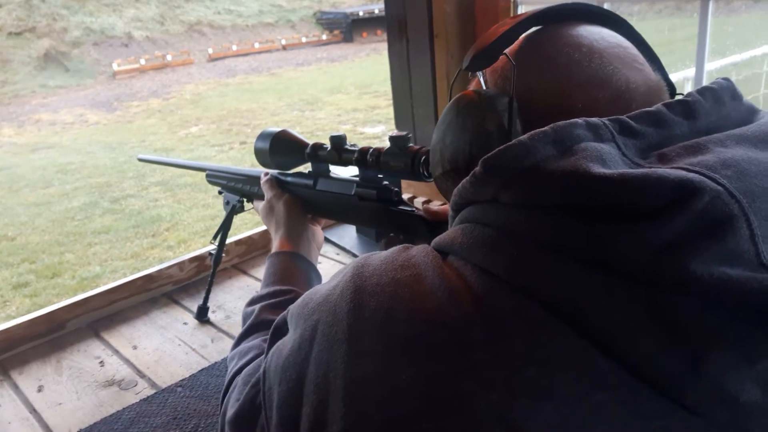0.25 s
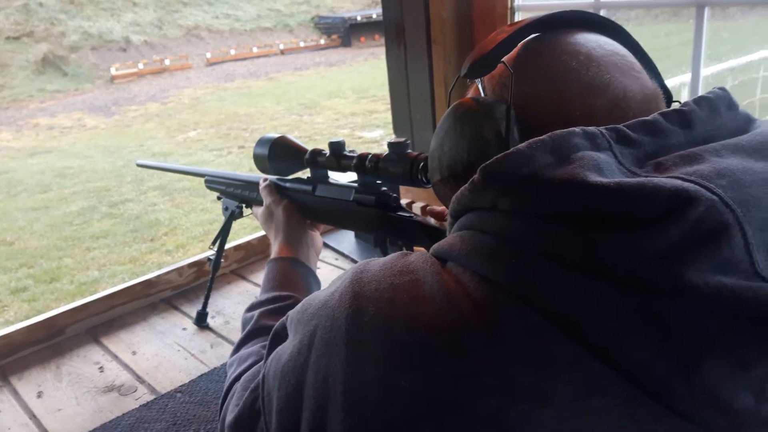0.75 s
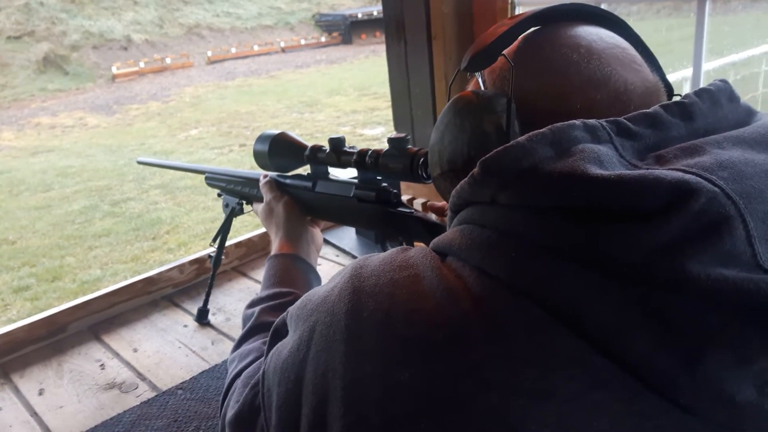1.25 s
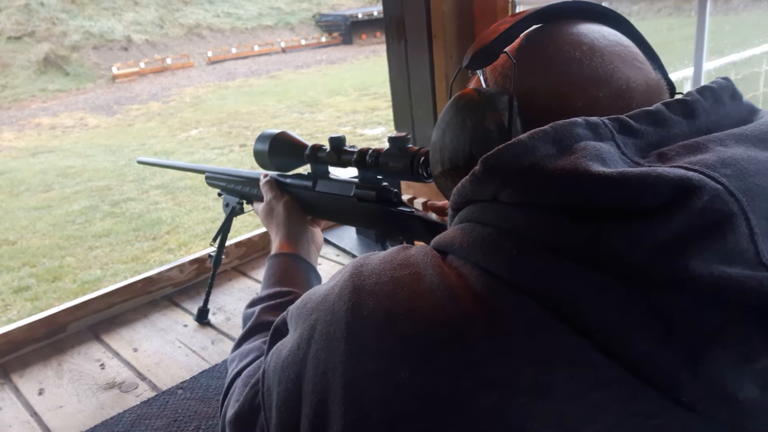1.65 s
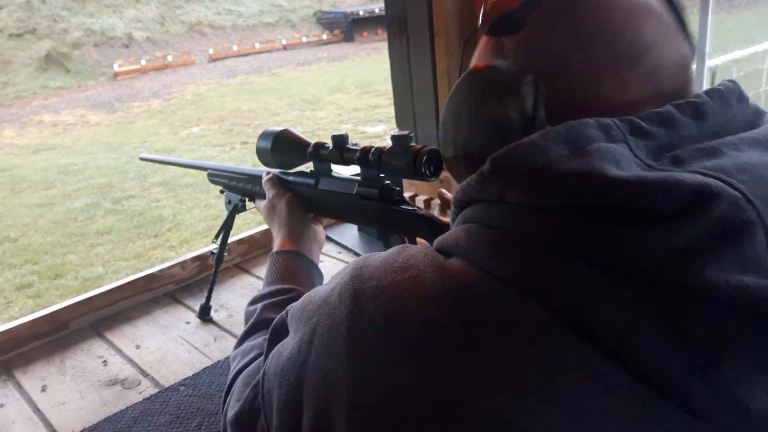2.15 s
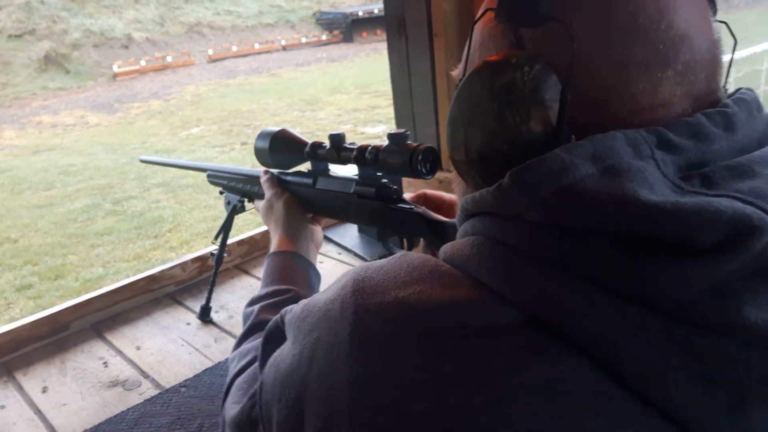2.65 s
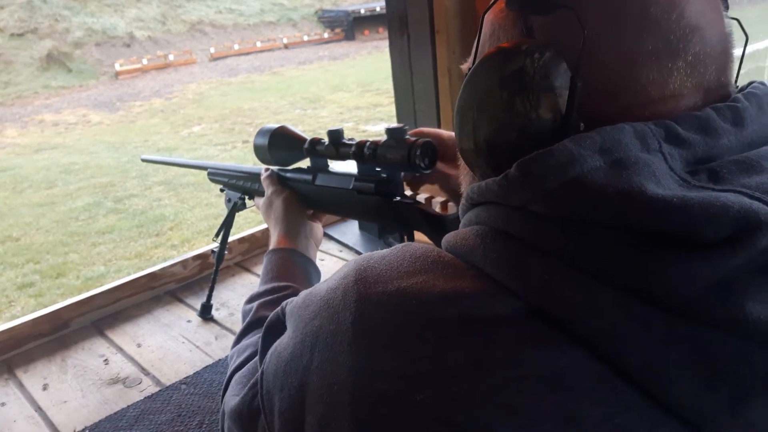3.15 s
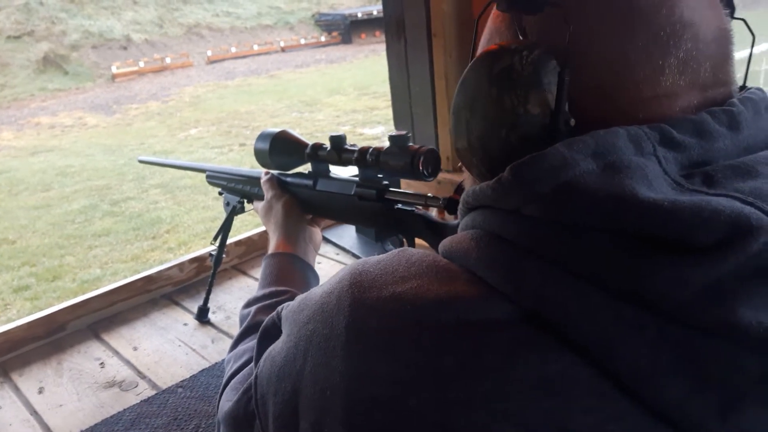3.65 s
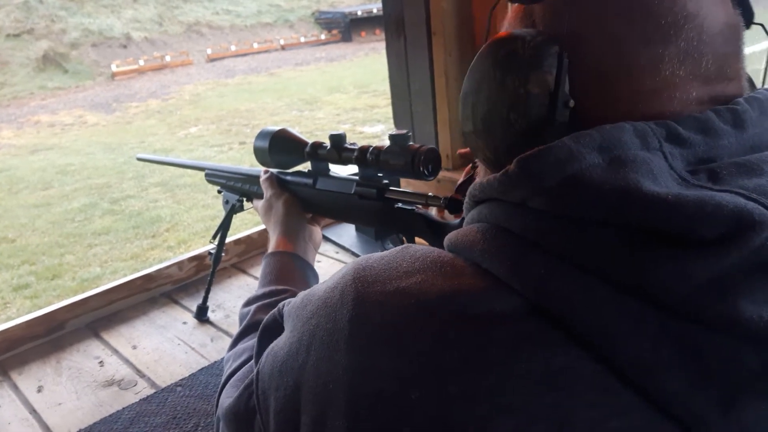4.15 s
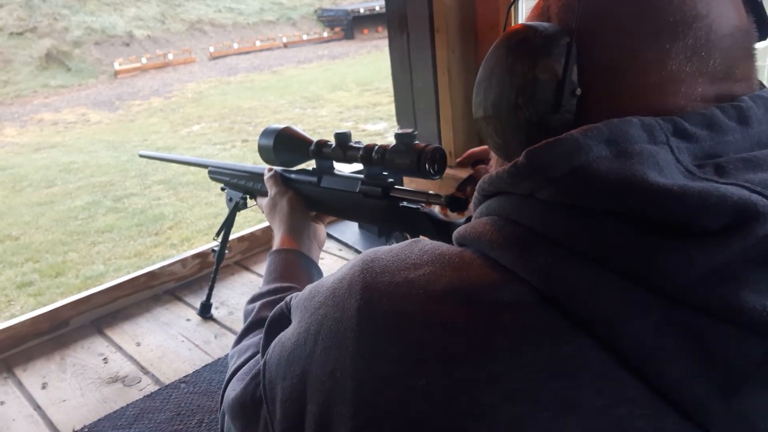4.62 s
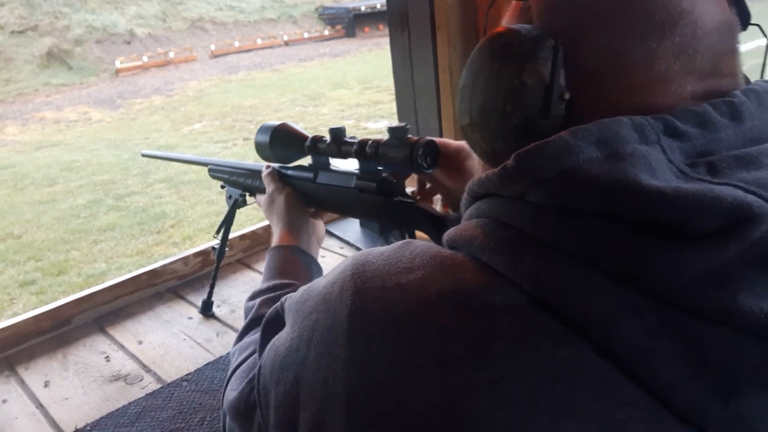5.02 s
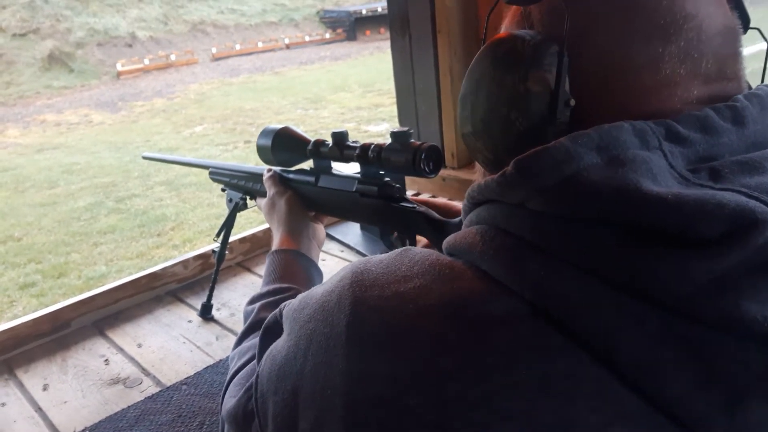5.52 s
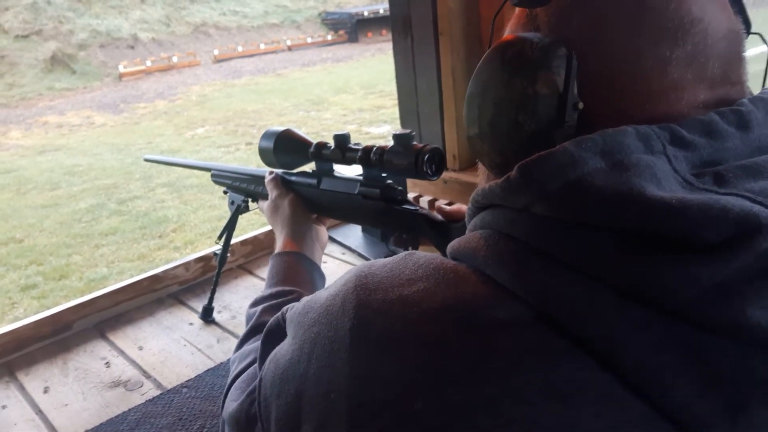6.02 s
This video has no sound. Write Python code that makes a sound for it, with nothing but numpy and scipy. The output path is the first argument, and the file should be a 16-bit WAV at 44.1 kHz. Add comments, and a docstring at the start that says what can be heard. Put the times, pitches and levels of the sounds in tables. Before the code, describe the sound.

Right at the start a rifle fires very close in a wooden shelter, overloading the microphone. The boxy boom is followed at once by the bullet's crack into a backstop and an echoing roll from the field. The sound ducks, then dull outdoor rumble creeps back. Much quieter metal clicks, scrapes and a firm clack follow as the bolt is worked, with soft bench knocks; later a second, sharper cluster of clicks.

```python
"""A bolt-action rifle is fired from a wooden shelter: a shock front, then noise and modes boom and ring.
The blast overloads the input and returns from the field as echoes and decaying noise; the bullet cracks
into the backstop. The gain control ducks at once, holds, and slowly lets the outdoor rumble (wavering
noise) back in. The bolt is then lifted, drawn back and closed: noise bursts ring the resonances of stock and
action, steel slides and squeals, and hands and arms knock on the wooden bench."""
import sys
import numpy as np
from scipy import signal
from scipy.io import wavfile
from scipy.ndimage import minimum_filter1d

SR = 44100
rng = np.random.default_rng(int(sys.argv[2]) if len(sys.argv) > 2 else 0)


def master(y):
    """Save y as 16-bit WAV."""
    cut = np.clip(np.atleast_2d(y).T, -1, 1)
    pcm = np.round(cut * 32767)  # scale
    wavfile.write(sys.argv[1], SR, pcm.astype(np.int16))


N = 276827

SHOT_S, IMPACT_S = .157, .353
# Blast filling the shelter: (frequency [Hz], relative spectral density [dB])
BLAST_SPECTRUM = [(30, -35), (70, -16), (109, -6), (189, 0), (277, 1), (450, 6), (620, 6), (800, 2),
                  (1190, -1), (1936, -11), (4870, -22), (7000, -30.5), (15000, -33)]
# Blast returning from field and trees: (frequency [Hz], relative spectral density [dB])
ROLL_SPECTRUM = [(30, -21), (80, -14), (160, 1.5), (360, -4), (710, -2), (1200, -11.5), (2200, -23),
                 (5000, -27), (15000, -46)]
# Spray of earth from the backstop: (frequency [Hz], relative spectral density [dB])
SPRAY_SPECTRUM = [(40, -27), (260, 9), (493, 4.5), (1280, -3), (3400, -15.5), (4970, -25.5), (14700, -78)]
# Air and boards of the shelter: (frequency [Hz], level [dB], t60 [s])
SHELTER_MODES = [(153, 22.5, 0.47), (238.4, 27.5, 0.4), (277.3, 23.5, 0.32), (296.4, 20, 0.38),
                 (349, 23.5, 0.25), (380.8, 20.5, 0.2), (409, 22.5, 0.22), (470.6, 25, .27),
                 (520.7, 23, 0.3), (553, 23.5, 0.2), (644.7, 29, 0.16), (703, 23.5, 0.32),
                 (890, 18.5, 0.25), (925, 22, .2), (1063, 18.5, 0.15), (1140, 19, .22)]
# Metal fittings that sing on, a close pair beating: (frequency [Hz], level [dB], t60 [s])
FITTING_MODES = [(484, -23, 1.8), (662, -14, 1.0), (1109, -22, 1.2), (2148, -12, .5), (3316, -12, .42),
                 (1497, 5, .56), (1507, 1, .56)]
# Bright echoes off fence and target frames: (delay [s], level re blast [dB])
ECHOES = [(0.086, -25.5), (0.137, -27)]
# Backstop giving way with a low thump: (frequency [Hz], level [dB], t60 [s])
BACKSTOP_MODES = [(165, 12, .1), (245, 17, .08), (340, 12, .07)]
# Splintering crack of the backstop: (frequency [Hz], width [Hz], level [dB])
CRACK_RESONANCES = [(910, 540, 4), (1465, 110, 1.5), (2320, 350, -8), (3400, 460, -3.5), (5500, 1600, -31)]
# Metal contacts of the bolt; the harder the touch, the flatter its treble:
# (time [s], clank level [dB], treble slope [dB per octave], knock into the stock re clank [dB])
BOLT_CONTACTS = [(2.845, -50, -13.5, -1.5), (3.106, -48.5, -8, 6), (3.176, -48.5, -11, 2),
                 (3.185, -46.5, -11.5, 0), (3.356, -54.5, -13, 0.5), (3.367, -48.5, -13.5, 2),
                 (3.475, -56, -10, 6.5), (3.549, -45.5, -6, -5), (3.638, -49.5, -2, 5.5),
                 (3.659, -35, -15, -4.5), (3.682, -49, -17, 5.5), (5.061, -53, -11, 3.5),
                 (5.081, -49.5, -16.5, 4.5), (5.103, -41, -6, 0.5), (5.184, -46.5, -9, -1),
                 (5.235, -51, -10.5, -4)]
# Ranges of knock, clank, click and snap: (low edge [Hz], high edge [Hz], t60 [s])
CONTACT_BANDS = [(141, 680, 0.17), (847, 1730, 0.15), (2040, 4440, 0.16), (5100, 15000, 0.18)]
# Resonances of stock and action: (frequency [Hz], width [Hz], level [dB])
RIFLE_MODES = [(168, 15, 18), (266.5, 30, 15), (478, 27, 7), (553, 17, 11), (1039, 61, 19.5),
               (1111, 30, 19.5), (1196, 43, 13.5), (1527, 38, 11.5), (1646, 44, 3), (2417, 85, 3.5),
               (3185, 83, 3.5), (3940, 71, 5.5), (4170, 62, 5), (4460, 76, 6), (4990, 87, 7)]
# Bolt sliding in its raceway: (time [s], time scale [s], level [dB], squeal [Hz], squeal width [Hz])
SLIDES = [(3.526, 0.027, -71, 5000, 254), (3.558, 0.032, -56.5, 3660, 2200),
          (3.61, 0.022, -52.5, 3000, 350), (3.638, 0.013, -49, 4050, 260), (3.635, 0.014, -48.5, 4960, 220),
          (5.184, 0.0091, -45, 3160, 220)]
# Hands and arms knocking on the bench: (time [s], level [dB])
KNOCKS = [(3.882, -38), (3.89, -39), (3.913, -44), (4.147, -44.5), (4.797, -53), (5.362, -48.5)]
# Bench top: (frequency [Hz], level [dB], t60 [s])
BENCH_MODES = [(164, 1, 0.29), (275.5, -2.5, 0.26), (309, -3, 0.29), (419, -15, 0.18), (477, -3, 0.11),
               (533, -7.5, 0.13), (616, -11, 0.084), (890, -35, 0.073), (1054, -21, 0.11),
               (1267, -16, 0.12), (1620, -28, 0.074)]
# Wind and distant traffic: (frequency [Hz], relative spectral density [dB])
OUTDOORS_SPECTRUM = [(15, -49), (25, -15.5), (27, -19.5), (64, -3), (107, -7), (152, -0.5), (221, -5.5),
                     (305, -9), (399, -16.5), (537, -12), (919, -16.5), (2490, -41.5), (4380, -44.5),
                     (6920, -54.5), (15500, -55)]
# Level of the outdoor rumble, a few dB down at first: (time [s], level [dB])
OUTDOORS_LEVEL = [(1.5, -56), (2.2, -52), (3.6, -51.5), (6.28, -53)]


def shot(blast_db, roll_db, impact_db):
    """Impulsive excitation: the blast sets the shelter ringing, echoes and rolls; the bullet strikes later."""
    out = np.zeros(N)
    blast = from_db(blast_db) * burst(
        BLAST_SPECTRUM, bass_t60=.66, treble_t60=.172, bass_rise_s=.055, treble_rise_s=.0011,
        corner_hz=242, steepness=1.5, size=SR)
    roll = from_db(roll_db) * burst(
        ROLL_SPECTRUM, bass_t60=4, treble_t60=.4, bass_rise_s=.1, treble_rise_s=.1,
        corner_hz=365, steepness=1.3, size=3 * SR)
    spray = from_db(impact_db) * burst(
        SPRAY_SPECTRUM, bass_t60=.12, treble_t60=.23, bass_rise_s=.0094, treble_rise_s=.0022,
        corner_hz=300, steepness=2.2, size=SR // 2)
    shelter = struck(SHELTER_MODES, ring_up_s=.014, scatter=.97, size=SR)
    fittings = struck(FITTING_MODES, ring_up_s=.14, scatter=0, size=2 * SR)
    thump = struck(BACKSTOP_MODES, ring_up_s=.0041, scatter=.47, size=SR // 2)

    add(out, shock(db=26, length_s=.0003), SHOT_S)
    add(out, blast + shelter, SHOT_S)
    add(out, fittings, SHOT_S)
    for delay_s, db in ECHOES:
        echo = band(blast, 2000, 14000)   # slim things throw back only short waves
        add(out, from_db(db) * echo, SHOT_S + delay_s)
    add(out, roll, SHOT_S)
    add(out, spray + thump, IMPACT_S)
    add(out, crack(length_s=.004), IMPACT_S)
    return out


def shock(db, length_s):
    """Blast-wave pressure: an instant rise, then a fall through zero into suction."""
    age = np.arange(SR // 50) / SR / length_s
    return from_db(db) * (1 - age) * np.exp(-age)


def burst(spectrum, bass_t60, treble_t60, bass_rise_s, treble_rise_s, corner_hz, steepness, size):
    """Diffuse reflection: rise and decay times of noise pass from bass to treble values around a corner."""
    t, out = np.arange(size) / SR, 0
    for hz, noise in noise_bands(size):
        lowness = 1 / (1 + (hz / corner_hz) ** steepness)
        t60 = treble_t60 + lowness * (bass_t60 - treble_t60)
        rise_s = treble_rise_s + lowness ** 2 * (bass_rise_s - treble_rise_s)
        envelope = decay(t, t60) * (1 - np.exp(-t / rise_s))
        out = out + noise * from_db(density_db(spectrum, hz)) * envelope
    return out


def struck(modes, ring_up_s, scatter, size):
    """Modal superposition: sines swell together, then each dies away; scatter spreads phases [turns]."""
    t, rings = np.arange(size) / SR, 0
    for hz, db, t60 in modes:
        turns = hz * t + scatter * rng.random()
        rings = rings + from_db(db) * np.sin(2 * np.pi * turns) * decay(t, t60)
    return rings * (1 - np.exp(-t / ring_up_s))


def crack(length_s):
    """Fracture: noise passes twice through each resonance under a swell of a few milliseconds."""
    splinters = rng.standard_normal(SR // 10)
    swell = np.arange(SR // 10) / SR / length_s
    colour = 0
    for hz, width_hz, db in CRACK_RESONANCES:
        ringing = resonance(resonance(splinters, hz, width_hz), hz, width_hz)
        colour = colour + from_db(db) * rms_one(ringing)
    return colour * 2 * swell * np.exp(-swell ** 2)


def bolt():
    """Impact spectrum: each touch knocks the stock and rings the steel; hardness sets its treble slope."""
    out = np.zeros(N)
    steel_hz = np.array([np.sqrt(low * high) for low, high, _ in CONTACT_BANDS[1:]])
    octaves = np.log2(steel_hz / steel_hz[0])   # above the clank
    for s, db, slope_db, stock_db in BOLT_CONTACTS:
        levels_db = db + np.append(stock_db, slope_db * octaves)
        touch = contact(levels_db, direct=5.3, near_db=-16, near_s=.012,
                        linger_db=-29.5, linger_t60=2.5, vary_db=1.5)
        add(out, touch, s)
    return out


def contact(levels_db, direct, near_db, near_s, linger_db, linger_t60, vary_db):
    """Forced resonance: a spike and its reflections off roof and boards excite modes of varying strength."""
    t, out = np.arange(SR) / SR, 0
    echoes = rng.standard_normal(SR) * from_db(3.2 * rng.standard_normal(SR))
    echoes *= 1 + from_db(near_db) * np.exp(-(t / near_s) ** 2)   # nearest surfaces answer loudest
    echoes[0] = direct
    rung = echoes.copy()
    for hz, width_hz, db in RIFLE_MODES:
        mode_db = db + vary_db * rng.standard_normal()   # where the touch lands
        rung += from_db(mode_db) * resonance(echoes, hz, width_hz)
    for db, (low, high, t60) in zip(levels_db, CONTACT_BANDS):
        fading = decay(t, t60) + from_db(linger_db) * decay(t, linger_t60)
        part = band(rung * fading, low, high, order=3)
        out = out + from_db(db) * part / np.std(part[:SR // 50])   # level of the first 20 ms
    return out


def slides():
    """Stick-slip friction: uneven slips excite one resonance, broad for a scrape, narrow for a squeal."""
    out, size = np.zeros(N), SR // 5
    for s, length_s, db, hz, width_hz in SLIDES:
        slips = rng.standard_normal(size) * from_db(2.6 * rng.standard_normal(size))
        stroke = np.arange(size) / SR / length_s
        swell = 4 * stroke * np.exp(-2 * stroke)
        add(out, from_db(db) * rms_one(resonance(slips, hz, width_hz)) * swell, s)
    return out


def bench(wash_db, wash_t60, soft_hz):
    """Soft impact on a plate: wooden modes and a short wash of reflections, with the treble left out."""
    out, t = np.zeros(N), np.arange(SR // 2) / SR
    for s, db in KNOCKS:
        wash = rms_one(band(rng.standard_normal(len(t)), 250, 660)) * decay(t, wash_t60)
        wood = struck(BENCH_MODES, ring_up_s=.0027, scatter=1, size=len(t))
        add(out, from_db(db) * (wood + from_db(wash_db) * wash), s)
    return band(out + 1e-18, 80, soft_hz)


def outdoors(booth_db, booth_hz, booth_width_hz, waver_db):
    """Cavity resonance: dull open-air noise with wavering bass booms a little in the shelter's air."""
    air = 0
    for hz, noise in noise_bands(N):
        waver = waver_db * drift(count=50) if hz < 500 else 0
        air = air + noise * from_db(density_db(OUTDOORS_SPECTRUM, hz) + waver)
    air = air + from_db(booth_db) * resonance(air, booth_hz, booth_width_hz)
    level_db = np.interp(np.arange(N) / SR, *np.transpose(OUTDOORS_LEVEL))
    return rms_one(air) * from_db(level_db)


def drift(count):
    """Slow random variation: straight lines between evenly spaced random points, scaled to RMS 1."""
    return rms_one(np.interp(np.arange(N), np.linspace(0, N, count), rng.standard_normal(count)))


def noise_bands(size):
    """Band-limited noise: bands about a third of an octave wide as (Hz, samples), equally strong per Hz."""
    edges = np.geomspace(22, 17000, 30)
    white = rng.standard_normal((2, size)) * np.sqrt(SR / 2000)   # unit power per kHz
    bands = []
    for k, (low, high) in enumerate(zip(edges, edges[1:])):
        noise = band(white[k % 2], low, high)   # neighbours take different noise
        bands.append((np.sqrt(low * high), noise))
    return bands


def resonance(x, hz, width_hz):
    """Damped resonator: two poles, with a gain of about 1 at the peak."""
    r = np.exp(-np.pi * width_hz / SR)
    zeros = np.array([1, 0, -1]) * (1 - r * r) / 2
    poles = [1, -2 * r * np.cos(2 * np.pi * hz / SR), r * r]
    return signal.lfilter(zeros, poles, x)


def band(x, low_hz, high_hz, order=2):
    """Band-pass filtering: a Butterworth response keeps the range between two edges."""
    edges_hz = [low_hz, min(high_hz, .45 * SR)]
    return signal.sosfilt(signal.butter(order, edges_hz, "band", fs=SR, output="sos"), x)


def decay(t, t60):
    """Exponential damping: amplitude falls by 60 dB in t60 seconds."""
    return np.exp(-np.log(1000) * t / t60)


def density_db(spectrum, hz):
    """Spectral density: read in dB at one frequency, by straight lines over log frequency."""
    table = np.array(spectrum, float)
    return np.interp(np.log(hz), np.log(table[:, 0]), table[:, 1])


def from_db(db):
    """Decibel law: level to amplitude ratio."""
    return 10 ** (np.asarray(db) / 20)


def rms_one(x):
    """Effective value: scale a signal to RMS 1."""
    return x / np.sqrt(np.mean(x ** 2) + 1e-20)


def add(out, sound, s):
    """Superposition: mix a sound in at a given time [s]."""
    start = round(s * SR)
    out[start:start + len(sound)] += sound[:N - start]


def scene():
    """Linear superposition of rifle, bench and outdoor rumble on one channel."""
    rifle = shot(blast_db=28, roll_db=-9.5, impact_db=-1.5) + bolt() + slides()
    knocks = bench(wash_db=-5.5, wash_t60=.24, soft_hz=1700)
    rumble = outdoors(booth_db=-3, booth_hz=150, booth_width_hz=17, waver_db=1.5)
    return (rifle + knocks + rumble)[None]


def gain_control(x, threshold_db, depth_db, hold_s, release_s):
    """Dynamic compression: gain drops at once on a loud sound, stays down a while, then creeps back."""
    t = np.arange(N) / SR
    level_db = 20 * np.log10(np.abs(x).max(axis=0) + 1e-9)
    over_db = np.clip(level_db - threshold_db, 1e-6, depth_db)
    reach = int(hold_s * SR / 2)
    # largest excess within the past hold time
    held_db = -minimum_filter1d(-over_db, 2 * reach + 1, origin=reach, mode="constant")
    # the cut in dB decays exponentially until a larger one takes over
    cut_db = np.exp(np.maximum.accumulate(np.log(held_db) + t / release_s) - t / release_s)
    return x * from_db(-cut_db)


def record(dry):
    """Saturation and band limiting: gain control, overload, electronic hiss, then bass and top cut off."""
    ducked = gain_control(dry, threshold_db=-10, depth_db=28.5, hold_s=1.128, release_s=.33)
    ceiling = .9   # amplitude where overload flattens the wave
    hiss = from_db(-94) * rng.standard_normal(dry.shape)
    loud = ceiling * np.tanh(ducked / ceiling) + hiss
    loud = signal.sosfilt(signal.butter(2, 30, "high", fs=SR, output="sos"), loud)
    return signal.sosfilt(signal.ellip(10, .1, 80, 15700, fs=SR, output="sos"), loud)


dry = scene()
out = record(dry)
master(out)
```